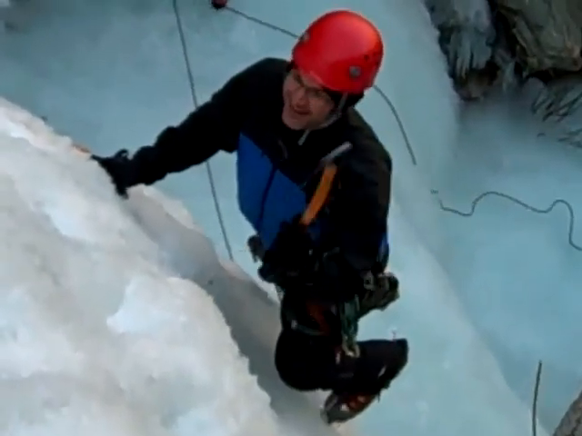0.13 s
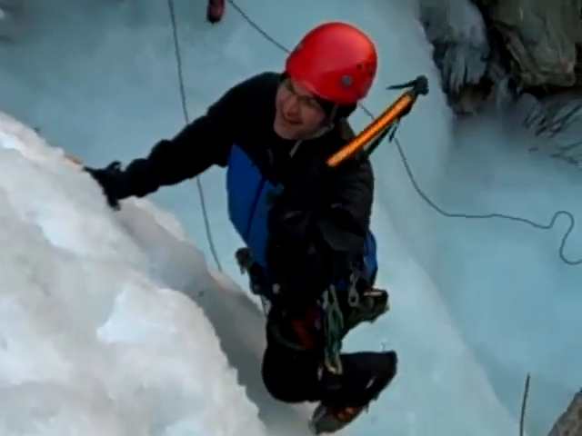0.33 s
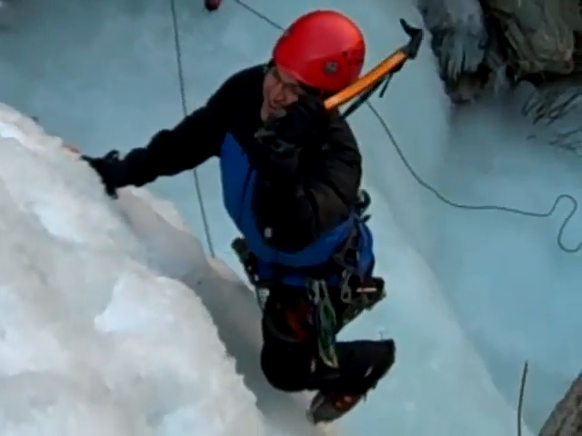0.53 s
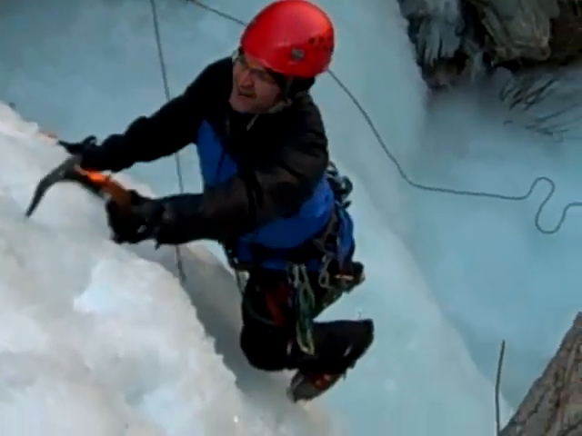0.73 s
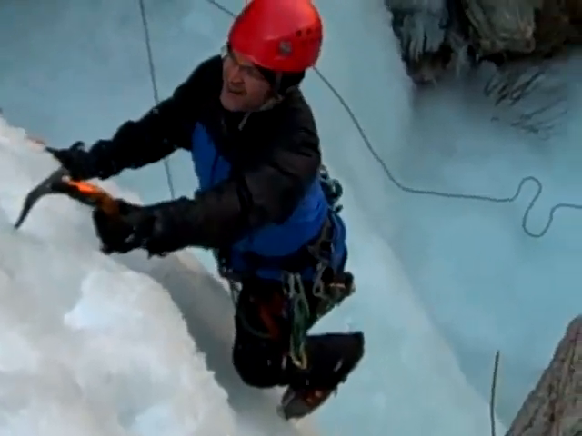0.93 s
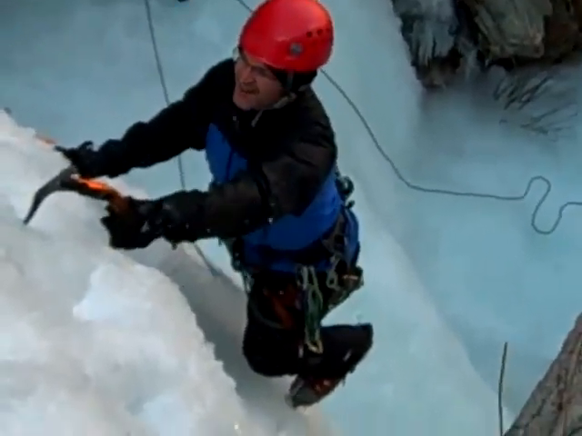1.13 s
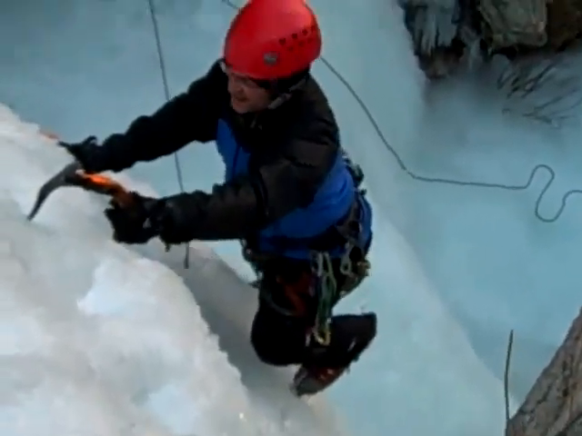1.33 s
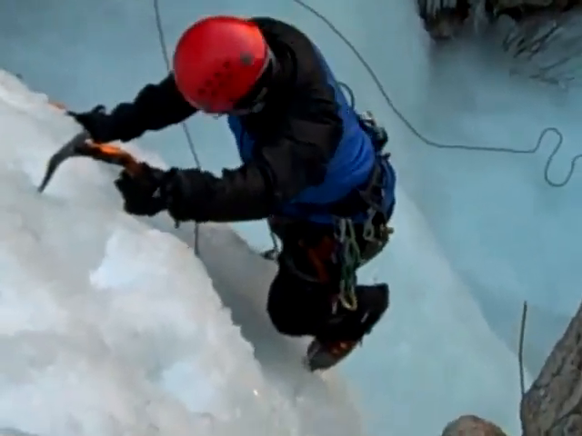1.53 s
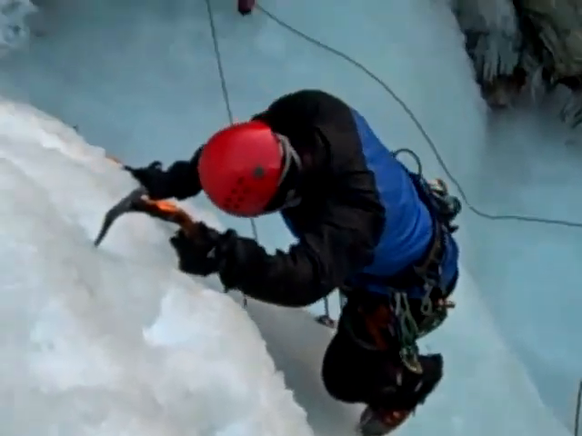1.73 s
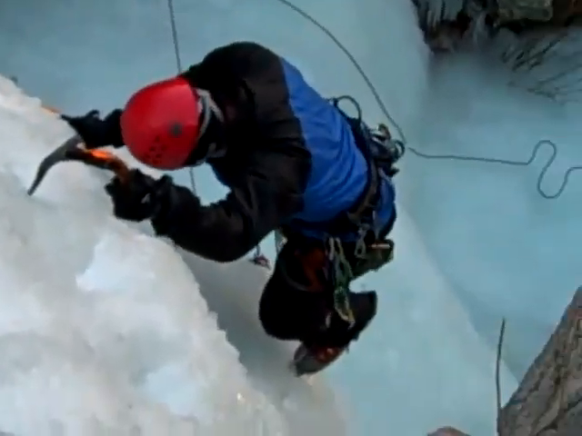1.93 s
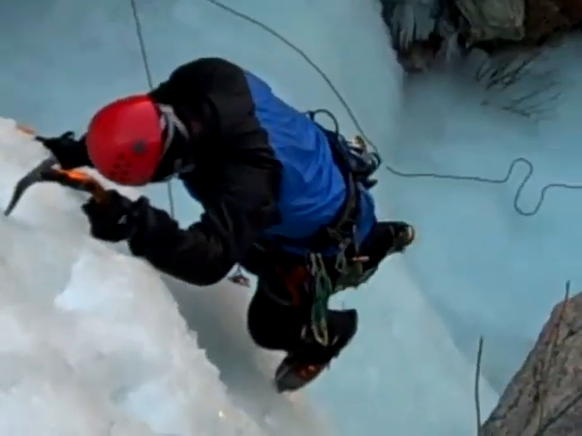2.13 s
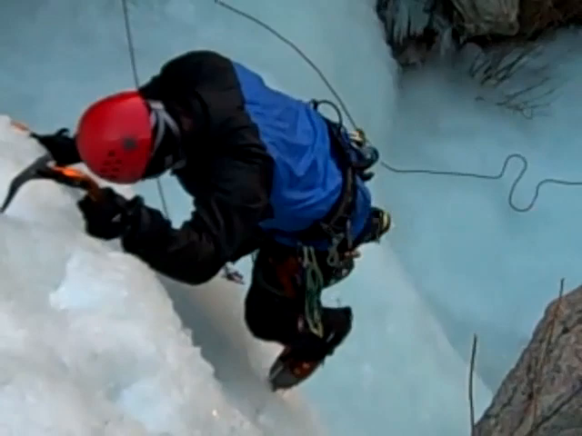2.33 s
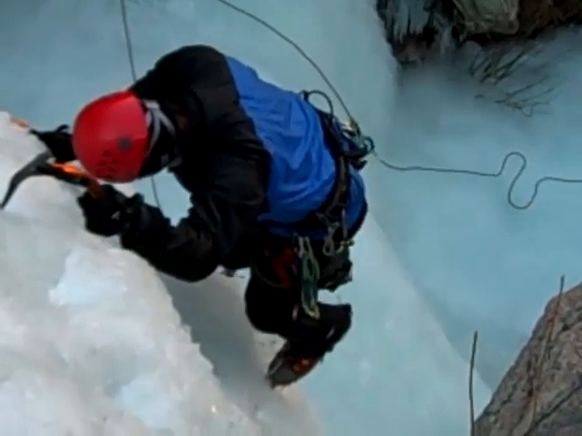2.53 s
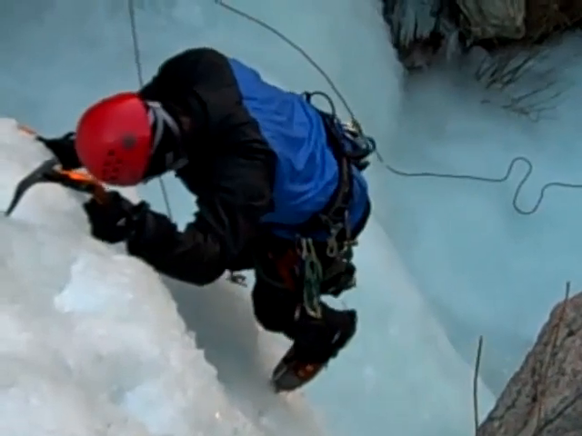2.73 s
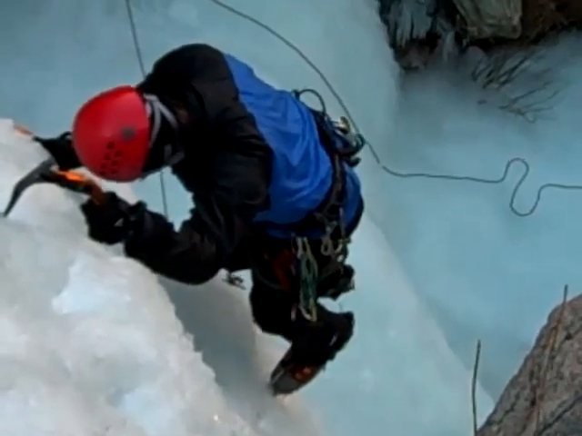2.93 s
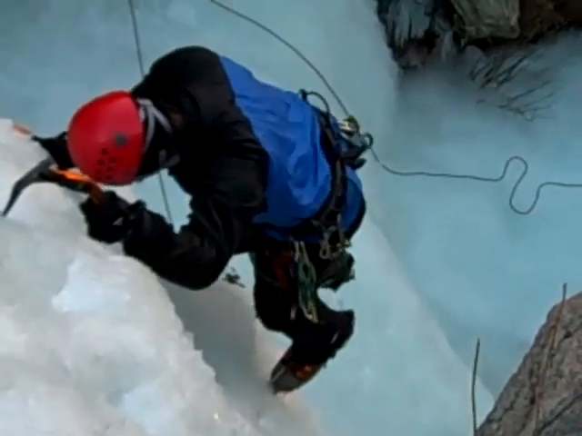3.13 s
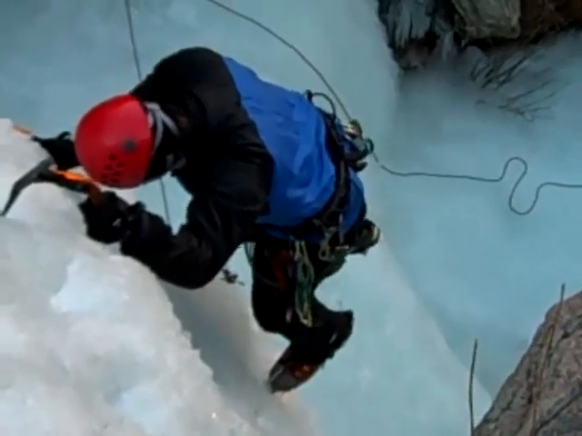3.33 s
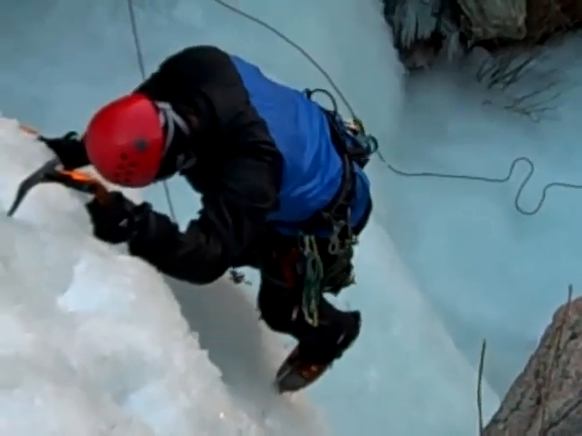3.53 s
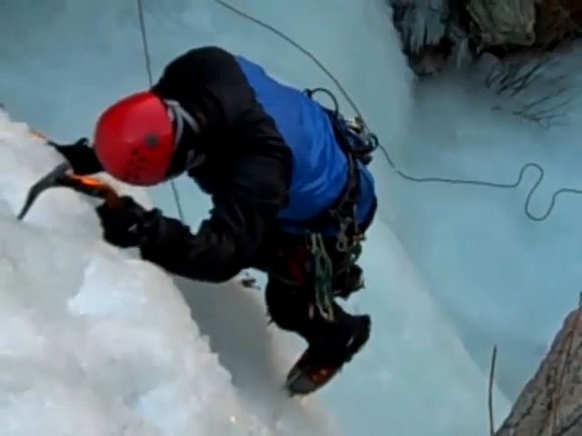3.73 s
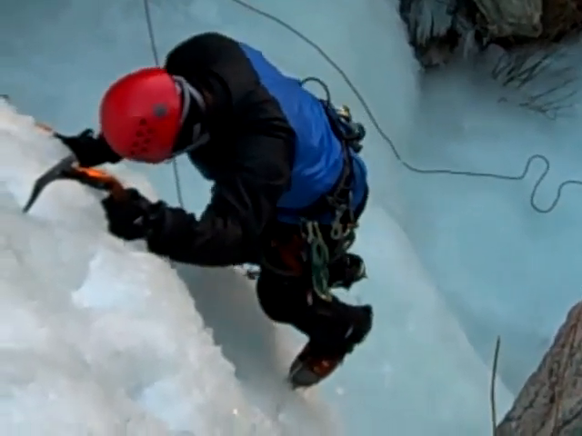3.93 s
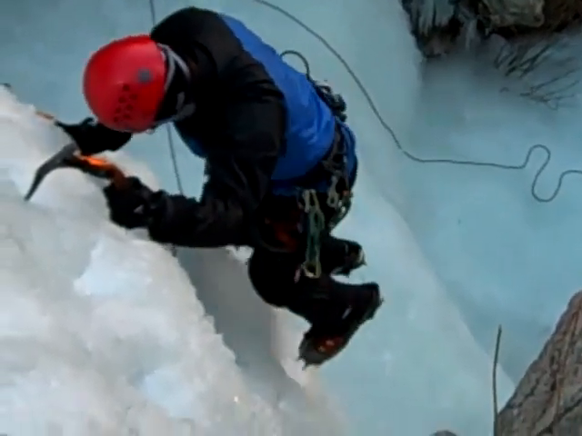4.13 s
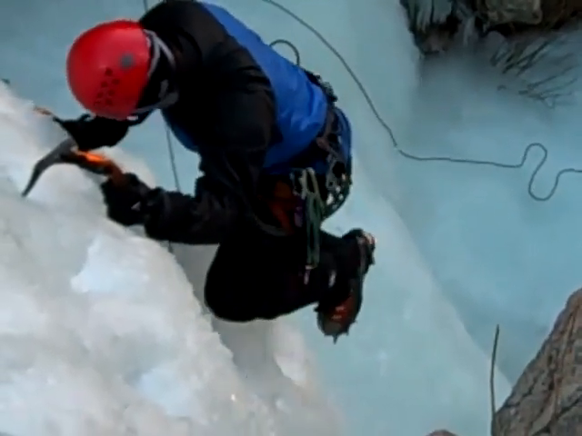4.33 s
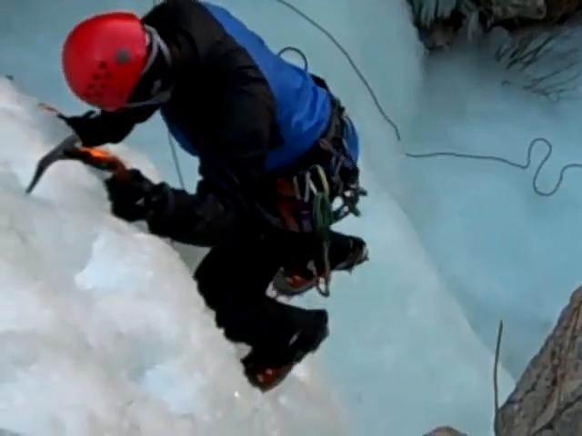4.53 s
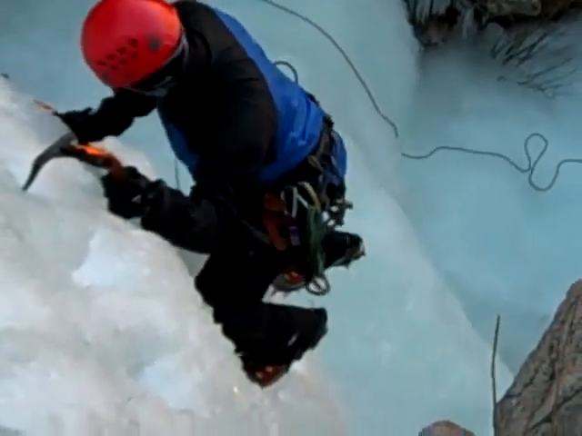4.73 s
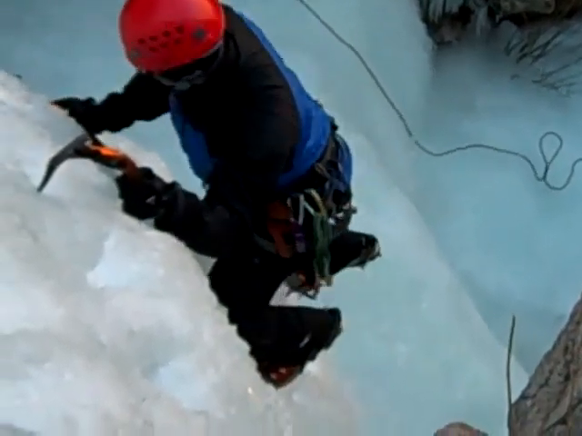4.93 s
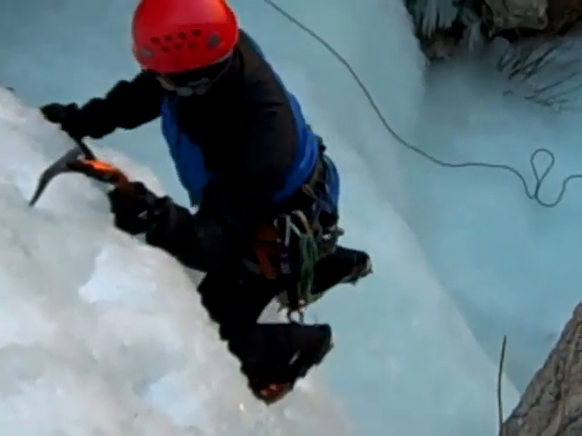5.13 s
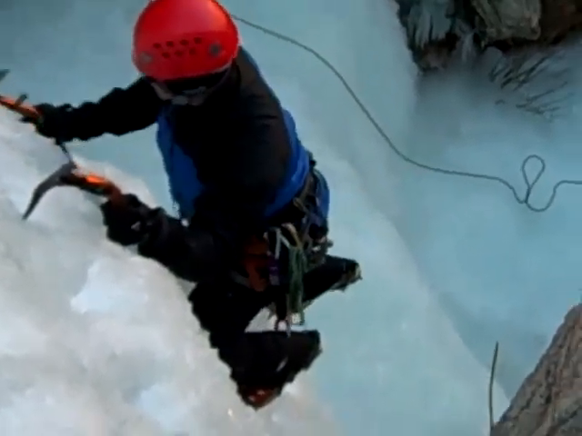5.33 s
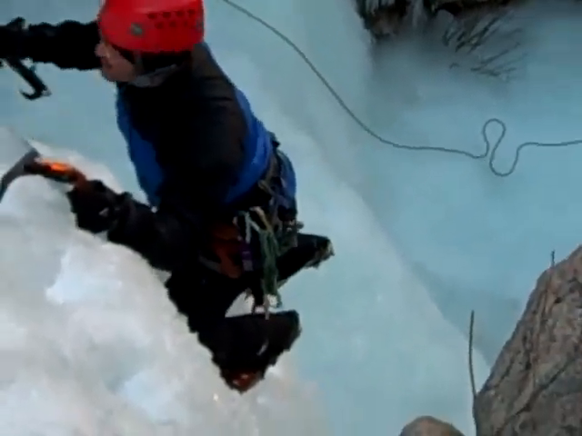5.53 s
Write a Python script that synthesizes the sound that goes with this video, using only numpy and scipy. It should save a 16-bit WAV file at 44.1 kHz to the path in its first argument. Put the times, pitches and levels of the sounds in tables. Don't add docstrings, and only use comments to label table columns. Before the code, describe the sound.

Ice climbing outdoors, heard from a few metres away on a mono camera microphone. A short metallic clink comes first, then a loud bright axe blow near one second with skittering chips. Sparse ticks and drips follow, then crunchy strikes around 2.6, 3.6 and 4.7 seconds and a double hit near 5.5. Clothes and rope rustle between blows, over faint water hiss and low wind.

```python
import sys
import numpy as np
from scipy import signal
from scipy.fft import rfft, irfft
from scipy.io import wavfile
from scipy.ndimage import uniform_filter1d

SR = 44100
rng = np.random.default_rng(int(sys.argv[2]) if len(sys.argv) > 2 else 0)


def materialize(psi):
    bounded = np.clip(np.atleast_2d(psi).T, -1, 1)
    quanta = np.round(bounded * 32767).astype(np.int16)
    wavfile.write(sys.argv[1], SR, quanta)


def natural_amplitude(level_db):
    exponent = np.asarray(level_db, float) / 20
    return 10 ** exponent


N = 246519

BAND_OCTAVES = np.array([0, 1.66, 3.1, 4.6])


def band(x, lo_hz, hi_hz):
    sos = signal.butter(3, [lo_hz, hi_hz], "band", fs=SR, output="sos")
    return signal.sosfilt(sos, x) * np.sqrt(SR / 2 / (hi_hz - lo_hz))


def walk(rate_hz):
    hold = max(int(SR / rate_hz), 1)
    steps = np.repeat(rng.standard_normal(N // hold + 1), hold)
    slewed = uniform_filter1d(uniform_filter1d(steps, hold), hold)
    return 1.3 * slewed[:N]


def crackle(spread_db, rate_hz):
    hold = max(int(SR / rate_hz), 1)
    grain_size = np.repeat(rng.exponential(size=N // hold + 1), hold)[:N]
    noise = rng.standard_normal(N) * natural_amplitude(spread_db * grain_size)
    return noise / noise.std()


def rings(modes, wobble_db):
    out = np.zeros(N)
    for start, hz, db, t60 in modes:
        i = int(start * SR)
        t = np.arange(int(t60 * SR)) / SR
        mode = natural_amplitude(db - 60 * t / t60) * np.sin(2 * np.pi * hz * t)
        out[i:i + len(t)] += mode[:N - i]
    return out * natural_amplitude(wobble_db * walk(146.05))


def stream():
    # frequency in Hz, density in dB per Hz.
    spectrum = [(88, -62), (150, -1), (716, 3), (871, 9), (1040, -10), (1120, -13), (2060, -2), (2270, -3),
                (16000, -59)]
    hz_at, db_at = np.transpose(spectrum)
    out = 0
    for hz in 140 * 2 ** np.arange(0, 6.9, .5):
        db = np.interp(np.log(hz), np.log(hz_at), db_at) + .8 * walk(10)
        hiss = band(rng.standard_normal(N), hz / 1.19, hz * 1.19)
        out = out + natural_amplitude(db) * np.sqrt(hz) * hiss
    return out / out.std() * natural_amplitude(-71)


def rumble():
    # time in seconds, level in dB.
    gusts = [(0.0, -73), (0.56, -74), (0.87, -72), (1.09, -79.5), (1.46, -77.5), (1.68, -78.5),
             (2.63, -79.5), (2.96, -80), (3.28, -76), (3.53, -70.5), (3.74, -77.5), (4.33, -79),
             (4.64, -71.5), (4.95, -76), (5.12, -70.5), (5.59, -81)]
    s, db = np.transpose(gusts)
    wind = band(rng.standard_normal(N), 20, 140)
    handling = natural_amplitude(-2) * band(rng.standard_normal(N), 12, 40)
    level_db = np.interp(np.arange(N) / SR, s, db) - 1.2 + 1.5 * walk(15)
    return natural_amplitude(level_db) * (wind + handling)


def sliding():
    # time in seconds, level in dB.
    rustle = [(0, -68.5), (.2, -64.5), (.45, -68), (.6, -67.5), (.9, -67), (1.15, -76), (1.32, -71.5),
              (1.5, -67.5), (2.1, -68), (2.58, -66.5), (2.95, -72), (3.1, -73), (3.5, -69), (4.0, -68.5),
              (4.3, -62.5), (4.6, -64), (5.0, -66), (5.59, -64)]
    rustle_colour = (-2.5, 1.3, -0.7, -4)
    # start in seconds, level in dB, length in seconds, tilt in dB per octave.
    slides = [(0.047, -58.5, 0.052, -1), (0.911, -48, 0.075, 0.5), (1.424, -72.5, 0.042, 1.5),
              (1.629, -61, 0.052, 1.5), (2.368, -72, 0.17, -5), (2.613, -46.5, .095, -.4),
              (2.864, -73, 0.11, 2.5), (3.403, -81, 0.039, 8), (3.545, -62.5, 0.13, 0.5),
              (3.625, -44.5, 0.06, -2.2), (3.778, -62, .04, .4), (4.12, -57.5, 0.059, -0.3),
              (4.356, -64, 0.11, 3.7), (4.685, -49.5, 0.12, -1.7), (5.048, -65.5, 0.32, 3),
              (5.438, -52, 0.064, -4), (5.508, -56.5, 0.056, -1.5)]
    slide_colour = (-11.5, -4, 1.3, 1.5)
    rise_s, sag_db_s, stop_db_s = 0.0052, 60, 260
    trickle_db, trickle_fall_db_s = -10, 52

    t = np.arange(N) / SR
    rustle_db = np.interp(t, *np.transpose(rustle)) + np.array(rustle_colour)[:, None]
    power = natural_amplitude(2 * rustle_db)
    for start, db, length, tilt_db in slides:
        i = int(start * SR)
        age = t[i:i + SR] - start
        rush = natural_amplitude(-2 * (sag_db_s * age + stop_db_s * np.maximum(age - length, 0)))
        trickle = natural_amplitude(2 * (trickle_db - trickle_fall_db_s * age))
        shape = np.clip(age / rise_s, 0, 1) * (rush + trickle)
        band_db = db + np.array(slide_colour) + tilt_db * (BAND_OCTAVES - BAND_OCTAVES[2])
        power[:, i:i + SR] += natural_amplitude(2 * band_db[:, None]) * shape
    return power


def shards(power, count, lo_hz, hi_hz, db, spread_db, follow, ring_s=.004):
    when, pitch, size, ring = rng.random((count, 4)).T
    hz = lo_hz * (hi_hz / lo_hz) ** pitch
    slide_db = 10 * np.log10(power[2, (when * N).astype(int)])
    level_db = db + follow * slide_db - spread_db * np.log(size + .03)
    t60 = ring_s * (1 + 7 * ring ** 4)
    return rings(zip(when * N / SR, hz, level_db, t60), wobble_db=.5)


def steel():
    # start in seconds, frequency in Hz, level in dB, t60 in seconds.
    pick = [(.040, 8900, -54, 0.083), (.0555, 8952, -52, 0.25), (.0555, 8680, -44, 0.24),
            (.0555, 8893, -53, 0.49), (.0555, 8740, -47, 0.25), (.0565, 8800, -23.5, 0.023)]
    # start in seconds, frequency in Hz, level in dB, t60 in seconds.
    gear = [(0.055, 4600, -48, .08), (0.073, 3760, -53, 0.13), (0.926, 8920, -44, 0.1),
            (4.973, 2400, -50, .04), (1.5062, 1200, -38, .006), (0.938, 945, -43, 0.08),
            (2.604, 8020, -32, 0.036), (2.630, 11700, -44, 0.03), (2.64, 11800, -54, 0.3),
            (1.010, 14000, -46, .02), (2.630, 13650, -46, .035), (2.919, 13600, -51, .025),
            (4.359, 3330, -54, .03), (4.368, 3300, -47.5, 0.024), (4.614, 2500, -45, .03),
            (3.757, 5300, -46, .01), (3.6165, 3900, -22, .012), (.9145, 4000, -24, .02),
            (2.611, 3900, -33, .03), (1.624, 3550, -52, .04), (4.492, 6234, -58.5, 0.28),
            (4.514, 6234, -50, 0.041), (4.519, 8630, -33, 0.029), (4.545, 13700, -54, .04),
            (4.577, 8800, -50, .03), (4.615, 11100, -61, 0.12), (4.854, 11900, -50.5, 0.036),
            (5.525, 6900, -61, .1), (5.475, 3140, -42, 0.083)]
    return rings(pick + gear, wobble_db=2.4)


def bursts(fractures, rise_share):
    force = np.zeros((4, N))
    t = np.arange(SR // 8) / SR
    for start, db, colour, narrow, t60_ms in fractures:
        i = int(start * SR)
        age = t * 1000 / max(t60_ms, 3)
        shape = (1 - np.exp(-age / rise_share)) ** 2 * natural_amplitude(-60 * age)
        band_db = db - narrow * abs(BAND_OCTAVES - colour)
        force[:, i:i + len(t)] += (natural_amplitude(band_db[:, None]) * shape)[:, :N - i]
    return force


def ice(power):
    # start in seconds, level in dB,
    # colour in octaves over 400 Hz, narrowness in dB per octave, t60 in ms.
    blows = [(0.0535, -20.5, 3.2, 16, 14), (0.0575, -21.5, 4.6, 21, 3.8), (0.9135, -12, 2.8, 10, 19),
             (0.9215, -10.5, 4.6, 3.5, 26), (0.9235, -14, 2.7, 9, 14), (2.601, -18.5, 4.6, 3, 26.5),
             (2.604, -31, 3.1, 5.5, 27), (2.6105, -26, 2, 3, 33), (3.604, -21.5, 4.6, 1, 37),
             (3.6155, -23.5, 3.1, 1.5, 19), (3.6165, -17, 2.8, 8, 4.7), (3.621, -26.5, 3.3, 1, 29),
             (4.688, -37, 2.6, 1.5, 114), (4.697, -23.5, 1.86, 7.5, 23), (4.701, -31, 2, 1, 34),
             (4.709, -20, 4.6, 22, 13), (5.4415, -24, 3.8, 4.5, 10.4), (5.4726, -25, 4.6, 2, 25),
             (5.531, -31.5, 2.3, 1, 11), (4.149, -36, 2.6, 1.5, 11), (4.749, -28.5, 2.1, 7, 39),
             (5.484, -43, 1.6, 2.5, 8.7)]
    # start in seconds, level in dB, colour in octaves over 400 Hz, t60 in ms.
    ticks = [(0.041, -39.5, 3.2, 13), (0.074, -40.5, 3.1, 22), (0.153, -35, 4, 16), (0.264, -59, 4.6, 16),
             (0.477, -40.5, 3.9, 19), (0.978, -40, 4.1, 14), (0.997, -39, 4.3, 14), (1.01, -39, 3.6, 9),
             (1.423, -52, 3.1, 15), (1.617, -36.5, 3.92, 55), (2.027, -46.5, 3.1, 11),
             (2.391, -34, 4.1, 10.5), (2.686, -34.5, 2.6, 7.7), (2.753, -43, 2, 14), (3.549, -42, 3.6, 15),
             (3.758, -30, 3.9, 8), (4.023, -48.5, 4.6, 41), (4.111, -33, 3.46, 31), (4.235, -35.5, 3.9, 9),
             (4.251, -41.5, 3.9, 25), (4.352, -38.5, 3.8, 43), (4.578, -41.5, 3.9, 11),
             (4.613, -49, 2.8, 43), (4.738, -31, 2.37, 39), (4.781, -35.5, 2.1, 26), (4.919, -43, 4.1, 21),
             (5.065, -42, 3.8, 14), (5.122, -44, 3.1, 16), (5.173, -47, .1, 11), (5.459, -32, 2, 16)]
    # start in seconds, level in dB.
    splinters = [(1.02, -36), (1.147, -55), (2.63, -31), (2.791, -42.5), (2.847, -48), (2.87, -45),
                 (2.892, -39.5), (2.912, -44), (2.919, -50), (3.045, -51.5), (3.408, -42), (3.42, -45),
                 (3.437, -50), (3.45, -46), (4.514, -38), (4.519, -44), (4.678, -42), (4.733, -29.5),
                 (4.969, -48), (5.033, -44), (5.157, -38.5), (5.171, -37), (5.202, -45), (5.267, -55),
                 (5.35, -51), (5.423, -48), (3.84, -50), (3.846, -52), (.362, -52), (.215, -54)]
    # colour in octaves over 400 Hz, narrowness in dB per octave, t60 in ms.
    splinter_tone = (4.6, 9.1, 9.2)
    # start in seconds, level in dB.
    crumbs = [(0.204, -50), (1.928, -52), (2.05, -52), (2.235, -53), (1.281, -55), (2.294, -50),
              (2.345, -47), (2.552, -50), (2.973, -52), (3.007, -62), (3.145, -52), (5.128, -42),
              (5.294, -48)]
    # colour in octaves over 400 Hz, narrowness in dB per octave, t60 in ms.
    crumb_tone = (2.3, 7, 17)
    # lower edge in Hz, upper edge in Hz.
    bands = [(200, 800), (800, 2000), (2000, 6000), (6000, 16000)]
    grit_share = (-4, -1.5, -0.5, 1.5)
    # centre in Hz, width in Hz, gain in dB.
    wall = [(444, 102, 6.5), (890, 66, -3), (1710, 440, 1), (200, 320, -6), (5740, 2040, -3),
            (3470, 1800, 2), (15900, 6900, -6)]

    small = [(s, db, colour, 10, t60_ms) for s, db, colour, t60_ms in ticks]
    small += [(*row, *splinter_tone) for row in splinters]
    small += [(*row, *crumb_tone) for row in crumbs]
    force = natural_amplitude(-1.) * bursts(blows, rise_share=.055) + natural_amplitude(1.) * bursts(small, rise_share=.03)
    cracks = crackle(1.3, 4000)
    grit = crackle(1.4, 2500) * natural_amplitude(.7 * walk(90))
    out = 0
    for k, (lo_hz, hi_hz) in enumerate(bands):
        slide = np.sqrt(power[k]) * natural_amplitude(1.1 * walk(45))
        out = out + band(force[k] * cracks + natural_amplitude(grit_share[k]) * slide * grit, lo_hz, hi_hz)

    hz = np.fft.rfftfreq(N, 1 / SR)
    wall_db = sum(db / (1 + (2 * (hz - centre) / width) ** 2) for centre, width, db in wall)
    return irfft(rfft(out) * natural_amplitude(wall_db), N)


def drips():
    # start in seconds, frequency in Hz, level in dB, t60 in seconds.
    drops = [(.435, 1680, -53.5, 0.11), (.495, 1816, -43.5, 0.048), (1.955, 1175, -52.5, 0.043),
             (2.055, 1330, -51, 0.046), (2.32, 1450, -50.5, 0.033), (2.955, 1100, -61, 0.12),
             (3.15, 1910, -55.5, 0.05), (4.148, 840, -42, 0.03), (5.297, 1500, -44, 0.039),
             (5.475, 400, -40, 0.068), (5.532, 930, -43, 0.081), (5.532, 1740, -44.5, 0.08),
             (5.445, 1730, -51, 0.09), (.9235, 1100, -20, 0.018), (.11, 98, -47.5, 0.05),
             (.27, 65, -55.5, 0.088), (.665, 115, -50, 0.054), (.9145, 2300, -24, .02),
             (1.5062, 480, -35, .009), (5.4415, 2300, -38, .025), (5.459, 1600, -41, .03),
             (2.611, 1400, -31, .03), (4.698, 2200, -31, .03), (5.375, 140, -54, .05),
             (5.17, 222, -51, 0.058), (.922, 69, -35, 0.035), (.922, 291, -27.5, 0.027),
             (2.605, 247, -39, 0.043), (3.616, 190, -60, 0.36), (4.70, 280, -45, 0.044)]
    return rings(drops, wobble_db=0.74)


def scene():
    far = stream() + rumble()
    power = sliding()
    crumbs = shards(power, count=2200, lo_hz=900, hi_hz=6500, db=-14.5, spread_db=3.4, follow=.75)
    chunks = shards(power, count=1500, lo_hz=605, hi_hz=2600, db=4.5, spread_db=3.5, follow=1.072)
    needles = shards(power, count=1500, lo_hz=3500, hi_hz=15000, db=-4.5, spread_db=3.6, follow=0.9,
                     ring_s=.0017)
    near = steel() + ice(power) + drips()
    return np.tile(near + crumbs + chunks + needles + far, (2, 1))


def top_cut(x):
    return signal.sosfilt(signal.butter(12, 16670, fs=SR, output="sos"), x)


def record(dry):
    # time in seconds, shift in full-scale units, width in seconds.
    shifts = [
        (.7, -.0006, 0.15),
        (.95, .002, 0.097),
        (1.4, -.0018, 0.075),
        (1.6, .0013, 0.053),
        (2.65, .003, 0.058),
        (3.47, -.002, 0.066),
        (3.68, .001, 0.038),
        (4.07, -.002, 0.054),
        (5.12, -.0015, 0.04),
    ]
    t = np.arange(N) / SR
    rest_level = -0.00041
    drift = rest_level + sum(size * np.exp(-.5 * ((t - s) / width) ** 2) for s, size, width in shifts)
    treble_cut = signal.ellip(8, .2, 70, 15900, fs=SR, output="sos")
    return top_cut(signal.sosfilt(treble_cut, dry) + drift)


dry = scene()
out = record(dry)
materialize(out)
```